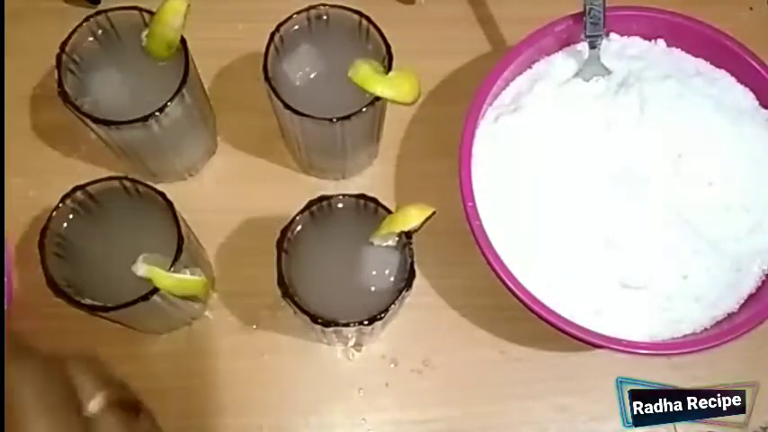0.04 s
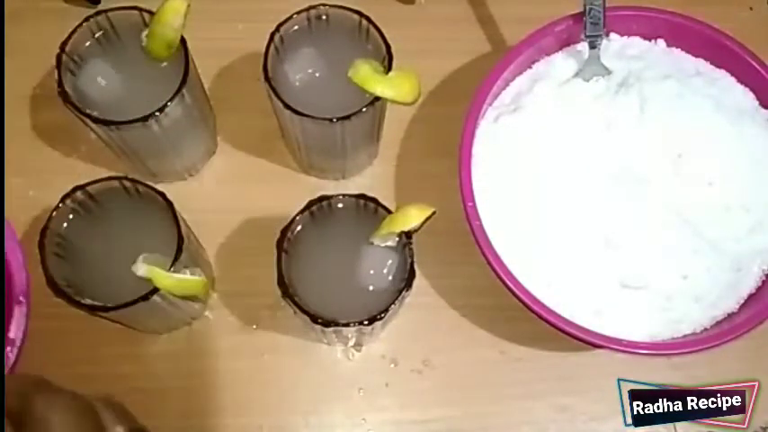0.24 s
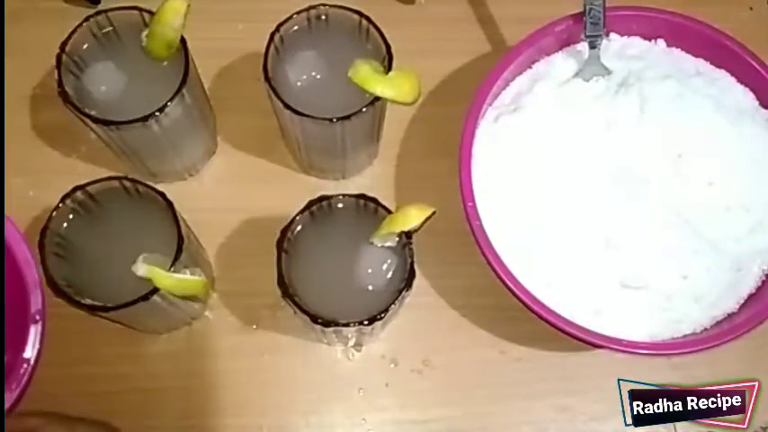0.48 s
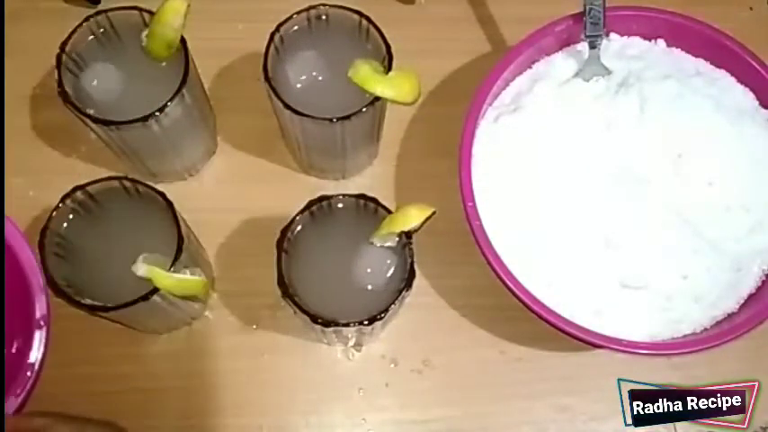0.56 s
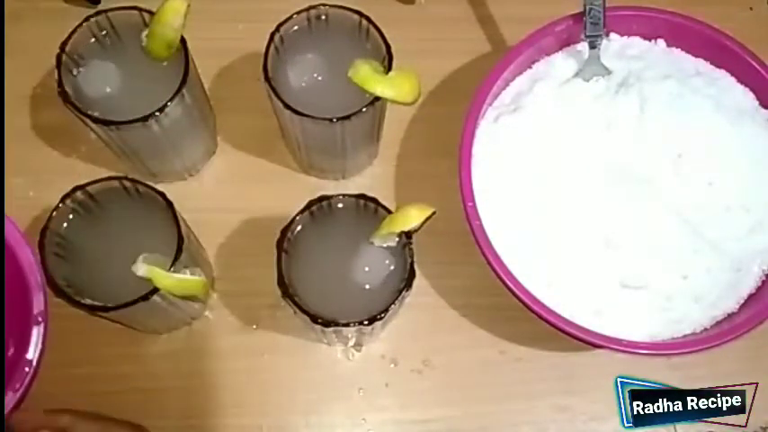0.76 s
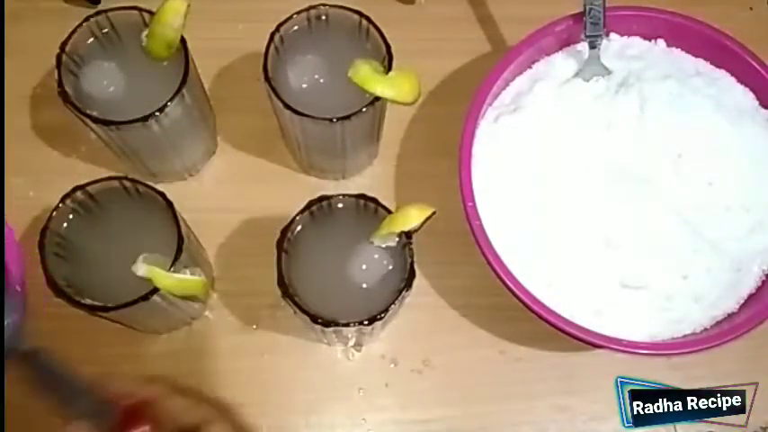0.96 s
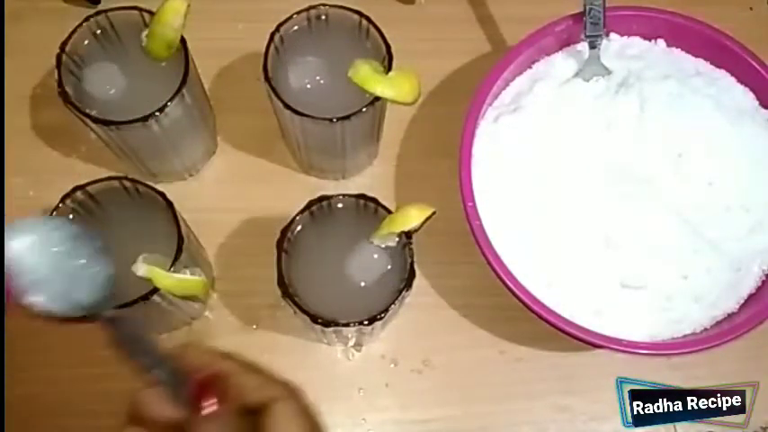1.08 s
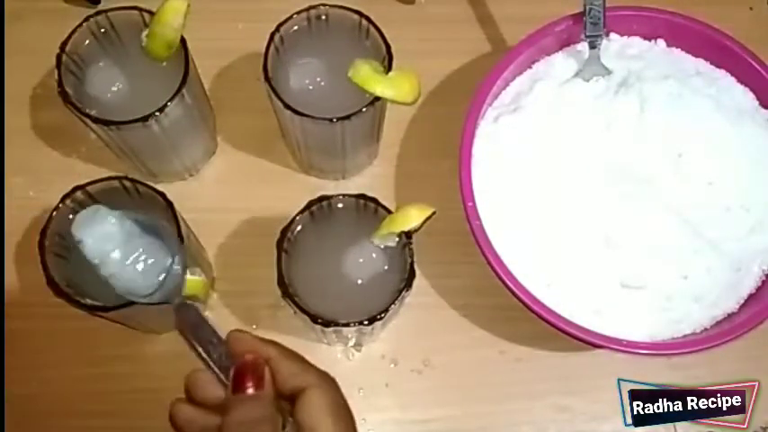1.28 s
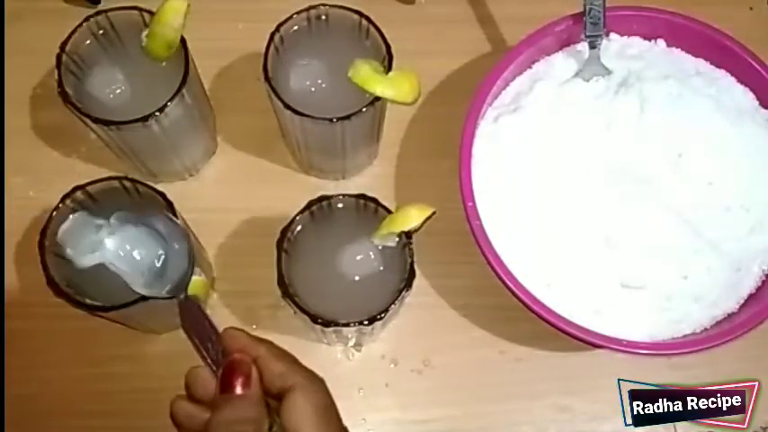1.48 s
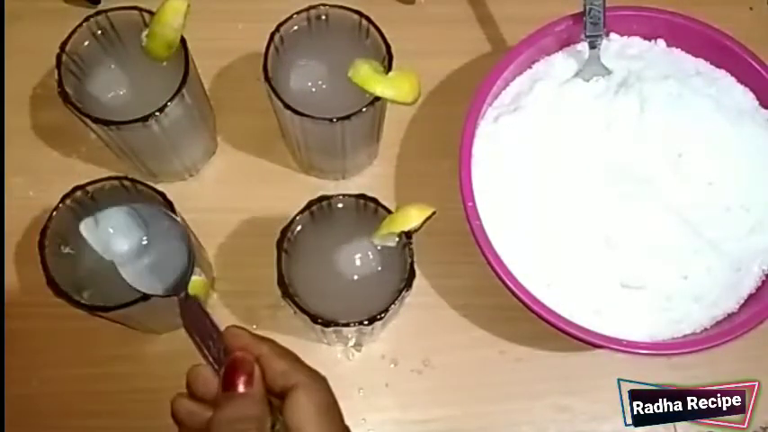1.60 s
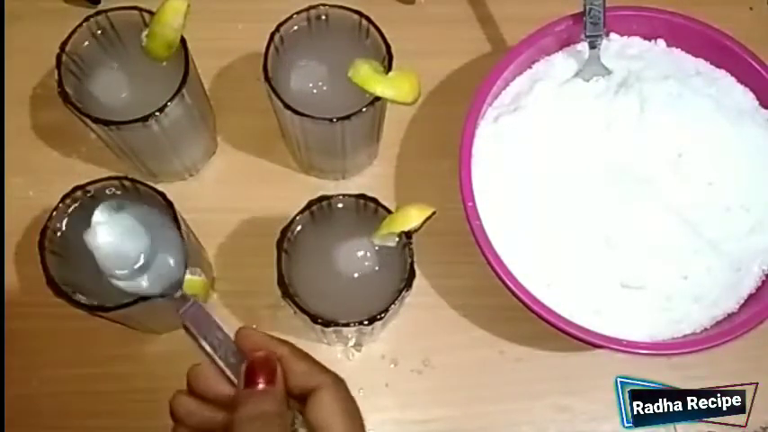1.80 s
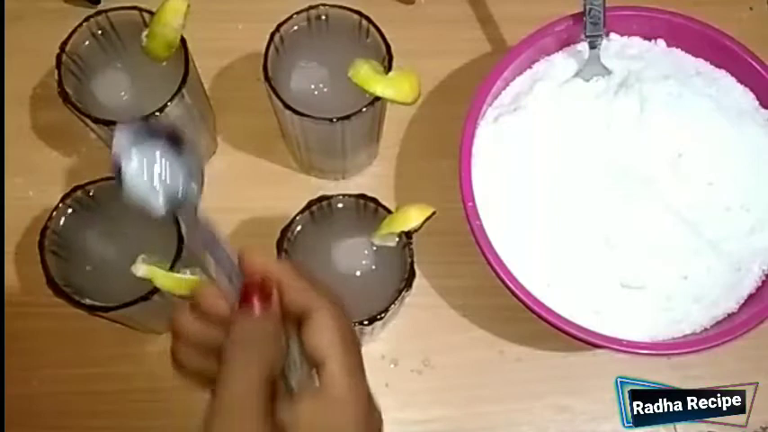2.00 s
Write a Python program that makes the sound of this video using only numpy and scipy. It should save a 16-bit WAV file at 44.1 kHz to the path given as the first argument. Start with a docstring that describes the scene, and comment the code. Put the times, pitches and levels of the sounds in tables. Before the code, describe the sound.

A steel spoon clatters sharply in a plastic bowl, then scrapes and scoops something wet. Soft table bumps follow, and the spoon clinks once on a filled glass, close by in a small room.

```python
"""A steel spoon clatters in a plastic bowl on a kitchen table, close by and a little to the right.
Each knock is a sharp crack followed by a short ring. The spoon scrapes and scoops something wet and
gritty, the bowl hums hollowly, and the table thuds softly. Near the end the spoon clinks once on a
filled glass. A small hard room echoes the knocks and the clink, over a faint murmur of air."""
import sys
import numpy as np
from scipy import signal
from scipy.fft import rfft, irfft, next_fast_len
from scipy.io import wavfile
from scipy.ndimage import uniform_filter1d, map_coordinates

SR = 44100
rng = np.random.default_rng(int(sys.argv[2]) if len(sys.argv) > 2 else 0)


def pcm_store(signal):
    """Save signal as 16-bit PCM."""
    levels = np.round(np.clip(np.atleast_2d(signal), -1, 1) * 32767)
    wavfile.write(sys.argv[1], SR, levels.astype(np.int16).T)


N = 90404

# Levels are relative. A fade time (T60) is how long a sound takes to drop by 60 dB.
# Pan is left minus right in dB, so a negative pan lies to the right.
# The tone of the room's murmur and of its hiss. Each row: frequency in Hz, level in dB.
MURMUR_TONE = [(20, 2.5), (40, -18.5), (85, 4.5), (150, -11), (200, -6.5), (270, -10.5), (400, -5.5),
               (600, -17.5), (850, -11.5), (1500, -24.5), (3000, -22.5), (6000, -119)]
AIR_TONE = [(3000, -7.5), (4500, -13.5), (7000, -14), (10000, -5.5)]
# Gritty scrapes. Each row: start and length in seconds, then rasp level, hiss level and pan in dB.
SCRAPE_STROKES = [(0, 0.067, -62, -39.5, -2.5), (0.078, 0.061, -45.5, -40.5, -2.5),
                  (0.184, 0.077, -39.5, -38, -6.5), (0.474, 0.1, -46, -45.5, -9),
                  (0.571, 0.057, -45.5, -64, -4), (0.638, 0.11, -48, -60.5, -15),
                  (0.735, 0.047, -68, -43.5, -3), (0.795, 0.042, -75, -36.5, -3),
                  (0.871, 0.028, -48.5, -31, -3.5), (1.06, 0.013, -88.5, -52, -2.5),
                  (1.118, 0.056, -94, -42, -4), (1.185, 0.056, -50.5, -44.5, -6),
                  (1.246, 0.11, -51, -49.5, -7.5), (1.4, 0.023, -56.5, -91, -7),
                  (1.517, 0.026, -59, -43, -4.5), (1.59, 0.025, -84.5, -54, -11),
                  (1.612, .015, -89, -52.5, -13), (1.784, 0.02, -87, -65.5, 7),
                  (1.852, 0.012, -64.5, -52.5, -3), (1.904, 0.028, -58.5, -71, 0),
                  (1.95, .05, -69, -60, -3), (2.013, .04, -59, -53, -6)]
# The tone of a scrape's rasp and of its fine hiss. Each row: frequency in Hz, level in dB.
RASP_TONE = [(100, -47), (1500, -20), (3300, -7), (4300, 0), (5600, 2.5), (7000, 0), (9000, -1.5),
             (16000, -76)]
HISS_TONE = [(100, -5.5), (4000, -28.5), (6800, -19), (8500, -3), (11200, 5), (13000, -2), (15500, -8.5)]
# Knocks of spoon on bowl. Each row: start in seconds, level in dB, six band levels in dB,
# fade time of the crack in seconds, pan in dB.
KNOCK_HITS = [(0.2053, -12, -30, -18, 0, -7, -1, -1.5, 0.0076, -5.5),
              (0.2287, -14.5, -9.5, 4.5, 6, 7, -3, -6.5, 0.0063, -6.5),
              (.2880, -26.5, -18, -16, 4.5, -7, -6, -0.5, 0.021, -8.5),
              (.303, -30.5, -6, 0, 7, 0, 2, 5, 0.031, -4),
              (0.3216, -10, 4, 8, -1, -2.5, -1, -3.5, 0.018, -6),
              (0.3353, -18, 6.5, -7.5, -14.5, 10, 9.5, -12, 0.011, -6.5),
              (.3460, -10.5, -10, -10.5, -12.5, -9.5, -8.5, -4, 0.0075, -20.5),
              (.4040, -19.5, -16.5, -1.5, 5.5, 2.5, 5, 7.5, 0.011, -7),
              (.4130, -26.5, 0, 9.5, -2.5, -2.5, 1, -7, 0.026, -5),
              (0.4172, -10, -10.5, 9, 7.5, -11.5, -6, -2.5, 0.018, -9.5),
              (0.4344, -27, -1, 6.5, 16, -6.5, 3, -14.5, 0.0057, -18),
              (.45, -31, -18, 5.5, -1, 5, 10, 1.5, 0.021, 0.5),
              (0.486, -29, -8.5, 3, 8.5, 3.5, 7, 0.5, 0.013, -6),
              (.577, -33.5, -23, -17, -20, -15, 6.5, -11, 0.017, -7),
              (0.6298, -29, -11, -1.5, -24, -22, -6, 2.5, 0.0052, -13)]
# The centres of those six bands in Hz: thump, hollow, body, ping, clack and snap.
BAND_CENTRES_HZ = [420, 750, 1250, 1950, 4200, 11000]
# Small objects give off little bass. Each row: frequency in Hz, level in dB.
BASS_CUT = [(60, -43), (200, -6.5)]
# The tone shared by all the cracks. Each row: frequency in Hz, level in dB.
CRACK_TONE = [(60, 4), (310, -11), (420, 4.5), (680, 2.5), (900, -7), (1200, 8), (1450, 6.5), (1650, 3),
              (2000, 7.5), (2900, 5), (3400, -1), (4200, 6.5), (5600, 2), (8200, 0.5), (11500, 5),
              (13000, 0.5), (15500, -7.5)]
# The ringing notes of bowl and spoon. Each row: pitch in Hz, level in dB, fade time in seconds.
BOWL_MODES = [(423, 4, .15), (605, -2, .12), (700, 0, .14), (868, -1, .18), (995, -2, .18), (1104, 1, .16),
              (1242, 1, .16), (1383, -1, .17), (1480, -7, .13), (1893, 3, .15), (1972, 3, .16),
              (2060, -1, .14), (2980, -5, .14), (4018, 3, .13), (4183, 2, .13), (4740, 1, .14),
              (7200, 0, .1)]
# Hollow hums and gurgles. Each row: start and length in seconds, pitch in Hz, level in dB.
HUM_NOTES = [(0.215, 0.0062, 215, -38), (0.574, 0.075, 835, -54), (0.708, 0.27, 1572, -53.5),
             (0.711, 0.0091, 683, -47), (0.749, 0.0066, 530, -41), (0.793, 0.025, 190, -31.5),
             (0.814, 0.027, 908, -39.5), (0.818, 0.048, 245, -45.5), (0.839, 0.011, 500, -43),
             (0.871, 0.021, 196, -36), (0.939, 0.0099, 389, -38), (0.943, 0.037, 182, -38.5),
             (1.209, 0.056, 244, -36.5), (1.279, 0.041, 250, -43), (1.251, 0.12, 312, -51.5)]
# Bumps on the table. Each row: start in seconds, level in dB.
TABLE_BUMPS = [(0.219, -47.5), (0.536, -48), (0.802, -43.5), (0.931, -46.5), (1.051, -39), (1.078, -36),
               (1.134, -35.5), (1.241, -42.5), (1.335, -39.5), (1.709, -38.5)]
# The table's low notes. Each row: pitch in Hz, level in dB, fade time in seconds.
TABLE_MODES = [(81, -4, 0.37), (97.4, 0.5, 0.17), (127.4, -10.5, 0.18), (190, -19, 0.56)]
# Deep scoops along the bowl. Each row: start and length in seconds, level in dB.
SCOOP_STROKES = [(0.729, 0.047, -53.5), (0.805, 0.083, -49), (0.879, 0.034, -36), (0.929, 0.056, -53)]
# The tone of a scoop. Each row: frequency in Hz, level in dB.
SCOOP_TONE = [(100, -3), (300, -3.5), (400, -10), (520, 3.5), (680, -8.5), (900, 5.5), (1300, -3),
              (2000, -5.5), (2800, 1.5), (3800, -8), (6000, -18.5), (16000, -48)]
# The spoon's tap on the glass. The one row: start in seconds, level in dB.
GLASS_TAPS = [(1.6618, -40.5)]
# The tone of the steel tick. Each row: frequency in Hz, level in dB.
TICK_TONE = [(200, -32), (2000, -34), (3500, -31), (4050, -5), (4900, 1), (5500, 15), (6200, 2.5),
             (7000, -0.5), (7600, -15.5), (8500, 2.5), (9800, -22), (11500, -9), (14000, -24.5)]
# The notes of the glass; the lowest two are so close that they pulse together.
# Each row: pitch in Hz, level in dB, fade time in seconds.
GLASS_MODES = [(2236, 3.5, .32), (2251, -2, .27), (3040, -17, .12), (4350, -16, .12), (5470, -5, .18),
               (6153, -12, .16), (7160, -14, .15), (8520, -10, .15), (12100, -17, .12)]
# How long the room echoes. Each row: frequency in Hz, fade time in seconds.
ECHO_FADES = [(200, 0.44), (1200, 0.31), (4000, 0.24), (10000, 0.28), (16000, 0.44)]
# How alike left and right sound. Each row: frequency in Hz, likeness from 0 (unrelated) to 1 (same).
STEREO_LIKENESS = [(80, 0.96), (300, 0.81), (700, 0.47), (1500, 0.04), (5000, 0.017)]

STROKE_RISE_S = 0.012  # how quickly scrapes and scoops build up


def amp(db):
    """Turn decibels into a number to multiply by."""
    return 10 ** (np.asarray(db) / 20)


def unit(x):
    """Scale a signal to an average (rms) level of 1."""
    return x / np.sqrt(np.mean(x ** 2) + 1e-20)


def along(points, hz):
    """Read between a table's rows on a logarithmic frequency scale."""
    freqs, values = np.transpose(points)
    return np.interp(np.log(hz + 1), np.log(freqs + 1), values)


def clock():
    """The time of every sample in seconds."""
    return np.arange(N) / SR


def wobble(per_second):
    """A smooth curve through this many random values a second."""
    return map_coordinates(rng.standard_normal(N // 8), [clock() * per_second], mode="wrap")


def filtered(x, response):
    """Multiply each frequency in x by response(hz)."""
    n = x.shape[-1]
    size = next_fast_len(n + 8192)
    return irfft(rfft(x, size) * response(np.fft.rfftfreq(size, 1 / SR)), size)[..., :n]


def coloured(x, curve, size=2048):
    """Shape the tone by curve(hz), in dB, without smearing any sound ahead of a hit."""
    cepstrum = irfft(curve(np.fft.rfftfreq(size, 1 / SR)) * np.log(10) / 20)
    cepstrum[1:size // 2] *= 2
    cepstrum[size // 2 + 1:] = 0
    return signal.fftconvolve(x, irfft(np.exp(rfft(cepstrum))))[:len(x)]


def spread(pair):
    """Blend two noises so left and right are alike in the bass and unrelated in the treble."""
    turn = lambda hz: np.arccos(np.clip(along(STEREO_LIKENESS, hz), -1, 1)) / 2
    mid, side = filtered(pair, lambda hz: np.array([np.cos(turn(hz)), np.sin(turn(hz))]))
    return np.array([mid + side, mid - side])


def noise(tone):
    """Stereo noise with the given tone, at level 1."""
    white = spread(rng.standard_normal((2, N)))
    return unit(filtered(white, lambda hz: amp(along(tone, hz))))


def pan(db):
    """Left and right gains that differ by db."""
    return amp(np.array([[db], [-db]]) / 2)


def fade(t, t60):
    """Die away by 60 dB every t60 seconds."""
    return 1e-3 ** (t / t60)


def swell(start, length, rise_s, t60):
    """A loudness curve that rises, holds and fades."""
    t = np.maximum(clock() - start, 0)
    return (1 - np.exp(-t / rise_s)) * fade(np.maximum(t - length, 0), t60)


def ring(modes, t):
    """A struck object's fading notes, a little different in strength at every blow."""
    return sum(amp(db + rng.normal(0, 1)) * fade(t, t60) * np.sin(2 * np.pi * hz * t)
               for hz, db, t60 in modes)


def add(out, start, x):
    """Mix x into out at start seconds."""
    part = out[:, round(start * SR):][:, :x.shape[-1]]
    part += x[..., :part.shape[1]]


def room_tone():
    """A steady low murmur of air with a faint hiss."""
    return amp(-56) * noise(MURMUR_TONE) * pan(db=0.5) + amp(-67.5) * noise(AIR_TONE)


def sliding_contact(x, depth_db=3, width_hz=350, life_s=0.07):
    """Narrow bands of the sound grow and shrink as the spoon slides."""
    hz, t, spectrum = signal.stft(x, SR, nperseg=512)
    patches = uniform_filter1d(rng.standard_normal(spectrum.shape[1:]), round(width_hz / hz[1]), axis=0)
    patches = uniform_filter1d(patches, round(life_s / t[1]), axis=1)
    spectrum = spectrum * amp(depth_db * unit(patches))
    return unit(signal.istft(spectrum, SR, nperseg=512)[1][:, :N])


def scrapes(grit_db=1.5):
    """The spoon drags through grit, making a rasp and a fine hiss, both broken into grains."""
    rasp_power, hiss_power = 0, 0
    for start, length, rasp_db, hiss_db, pan_db in SCRAPE_STROKES:
        stroke = swell(start, length, STROKE_RISE_S, t60=0.27)
        rasp_power += (amp(rasp_db) * stroke) ** 2
        hiss_power += (amp(hiss_db) * stroke * pan(pan_db)) ** 2
    grains = unit(amp(grit_db * wobble(per_second=220)))
    rasp = np.sqrt(rasp_power) * sliding_contact(noise(RASP_TONE))
    hiss = np.sqrt(hiss_power) * sliding_contact(noise(HISS_TONE))
    return grains * (rasp + hiss)


def in_room(x, echo_db, pan_db, early_db=2, build_s=0.0038, left_lag_s=0.00026):
    """Add the walls' quick early echoes and a longer tail. It all reaches the right side first."""
    hz, t, spectrum = signal.stft(spread(rng.standard_normal((2, SR // 2))), SR, nperseg=256)
    early = amp(early_db) * fade(t, t60=0.042)
    late = fade(t, along(ECHO_FADES, hz)[:, None])
    tail = signal.istft(spectrum * (late + early), SR, nperseg=256)[1]
    tail *= 1 - np.exp(-(np.arange(tail.shape[1]) / SR / build_s) ** 2)
    echo = signal.fftconvolve(x[None], tail / np.linalg.norm(tail[0]), axes=1)[:, :len(x)]
    left, right = x * pan(pan_db) + amp(echo_db) * echo
    late_left = np.pad(left, (round(left_lag_s * SR), 0))[:len(x)]
    return np.array([late_left, right])


def knocks(click_db=3.5, ring_db=-26.5):
    """Spoon hits bowl: a click, a short crack and a ring, with a tone set by where it lands."""
    out, t = np.zeros((2, N)), np.arange(SR * 2 // 3) / SR
    for start, db, *bands_db, t60, pan_db in KNOCK_HITS:
        spot_tone = lambda hz: along([*BASS_CUT, *zip(BAND_CENTRES_HZ, bands_db)], hz)
        click = amp(click_db) * (t == 0)
        burst = rng.choice([-1, 1], len(t)) * fade(t, t60)
        crack = coloured(click + burst, lambda hz: along(CRACK_TONE, hz) + spot_tone(hz))
        ringing = amp(ring_db) * coloured(ring(BOWL_MODES, t), spot_tone)
        add(out, start, amp(db) * in_room(crack, echo_db=2, pan_db=pan_db))
        add(out, start, amp(db) * in_room(ringing, echo_db=-8, pan_db=pan_db / 2))
    return out


def bowl_hums(waver_radians=1.2):
    """The wet bowl gives hollow, wavering notes as the spoon moves through it."""
    out = np.zeros(N)
    for start, length, hz, db in HUM_NOTES:
        phase = 2 * np.pi * hz * clock() + waver_radians * wobble(per_second=55)
        out += amp(db) * swell(start, length, rise_s=0.02, t60=0.17) * np.sin(phase)
    return out


def table_thuds(rise_s=0.0071):
    """Soft bumps wake the table's lowest notes, heard to the left."""
    out, t = np.zeros((2, N)), np.arange(SR // 2) / SR
    for start, db in TABLE_BUMPS:
        add(out, start, amp(db) * ring(TABLE_MODES, t) * (1 - np.exp(-t / rise_s)))
    return out * pan(db=9.5)


def scoops():
    """The spoon digs along the bowl, whose wall gives the scrape a deeper tone."""
    digging = sum(amp(db) * swell(start, length, STROKE_RISE_S, t60=0.21)
                  for start, length, db in SCOOP_STROKES)
    return digging * noise(SCOOP_TONE)


def glass_clink(tick_db=21, rise_s=0.0004, sway_hz=6, pitch_bend=0.012, pan_db=-4):
    """A light steel tick rings the glass, whose pitch bends as the drink sways."""
    out, t = np.zeros((2, N)), np.arange(SR // 2) / SR
    sway = 2 * np.pi * sway_hz
    bent_time = t + pitch_bend * np.sin(sway * t) / sway  # faster time means higher pitch
    for start, db in GLASS_TAPS:
        burst = rng.choice([-1, 1], len(t)) * fade(t, t60=0.0076)
        tick = amp(tick_db) * coloured(burst, lambda hz: along(TICK_TONE, hz))
        ringing = ring(GLASS_MODES, bent_time) * (1 - np.exp(-t / rise_s))
        add(out, start, amp(db) * in_room(tick, echo_db=1, pan_db=pan_db))
        add(out, start, amp(db) * in_room(ringing, echo_db=0.5, pan_db=pan_db))
    return out


def scene():
    """Mix the spoon and bowl with the table, the glass and the air."""
    spoon_and_bowl = knocks() + scrapes() + bowl_hums() + scoops()
    return spoon_and_bowl + table_thuds() + glass_clink() + room_tone()


def record(dry):
    """Cut away the very highest treble."""
    return filtered(dry, lambda hz: hz < 15800)


dry = scene()
out = record(dry)
pcm_store(out)
```